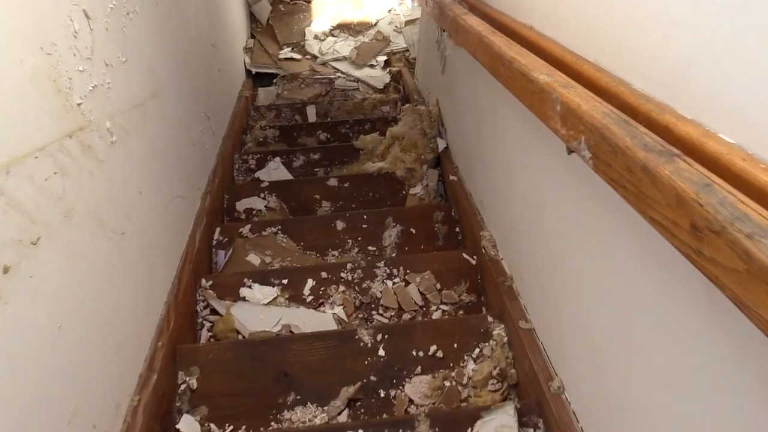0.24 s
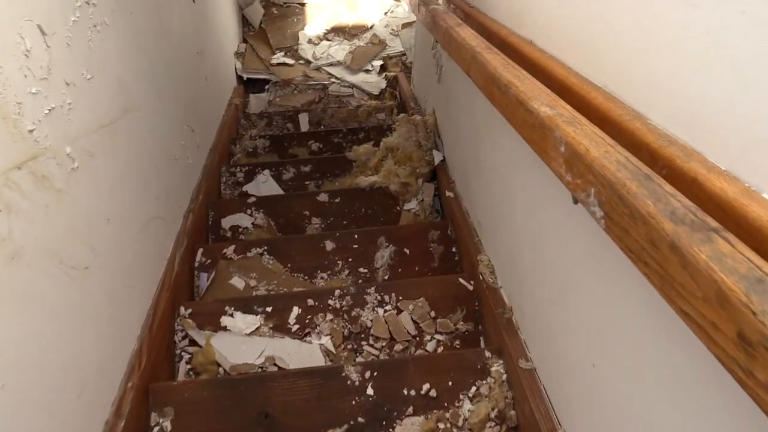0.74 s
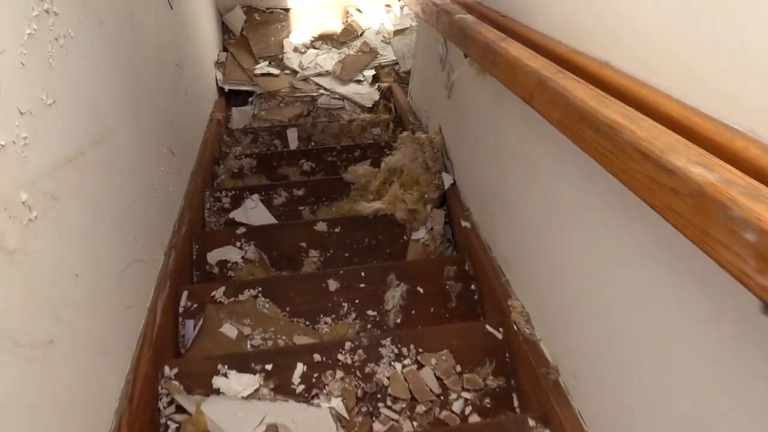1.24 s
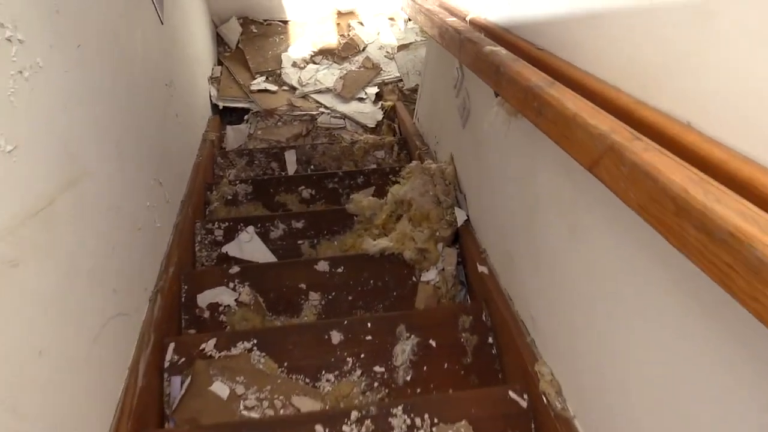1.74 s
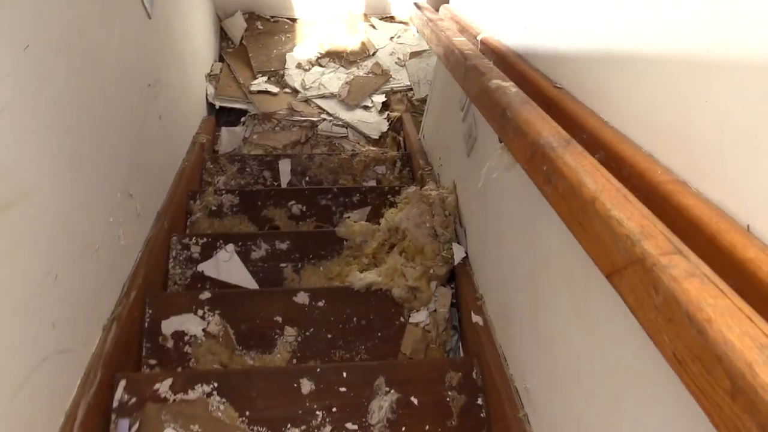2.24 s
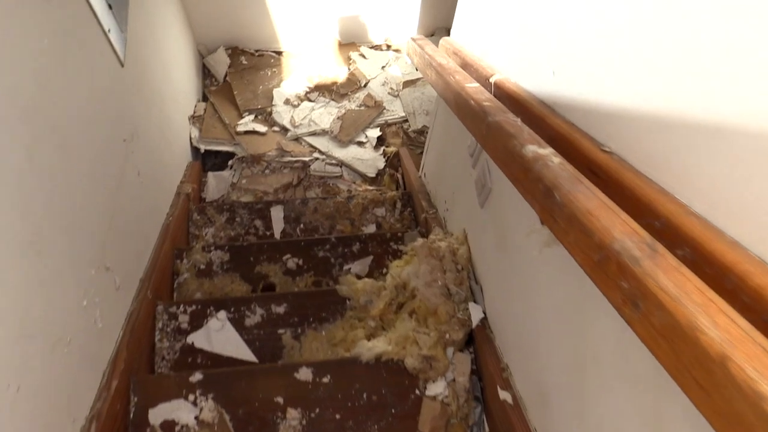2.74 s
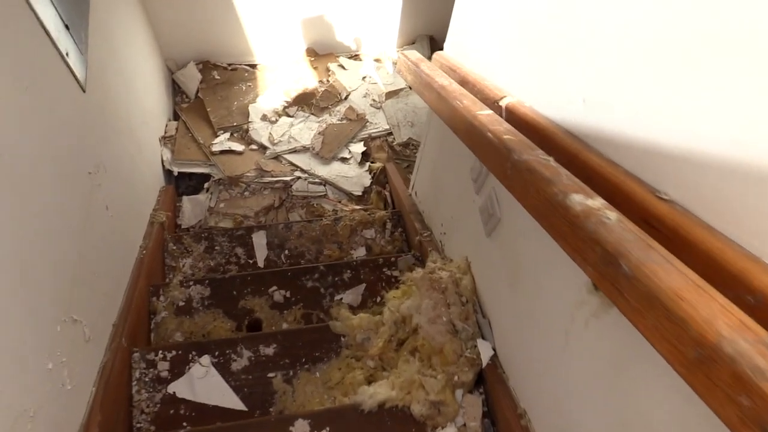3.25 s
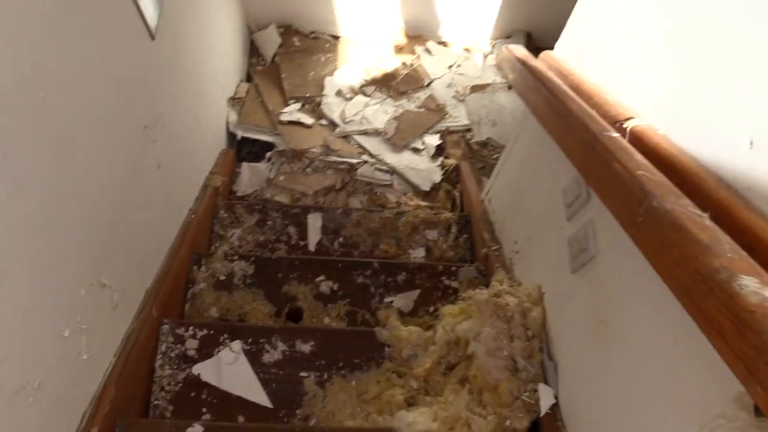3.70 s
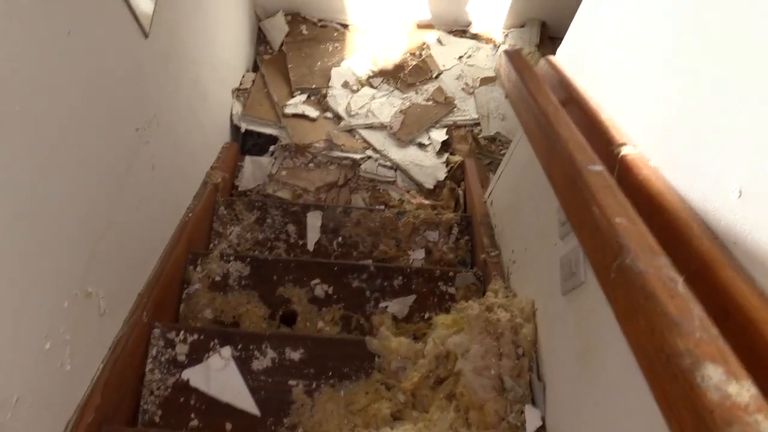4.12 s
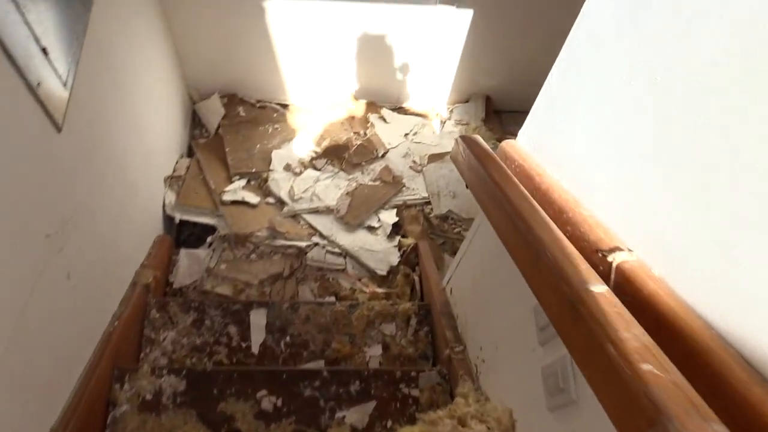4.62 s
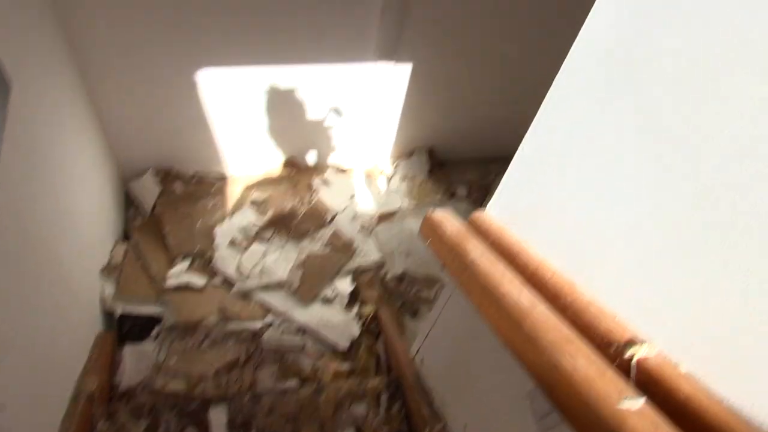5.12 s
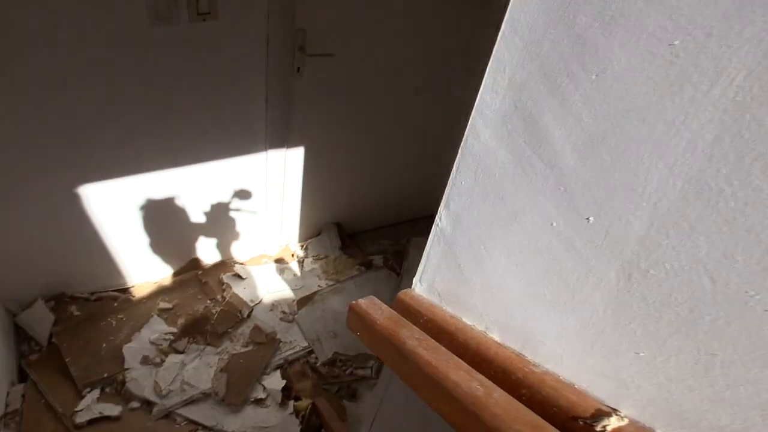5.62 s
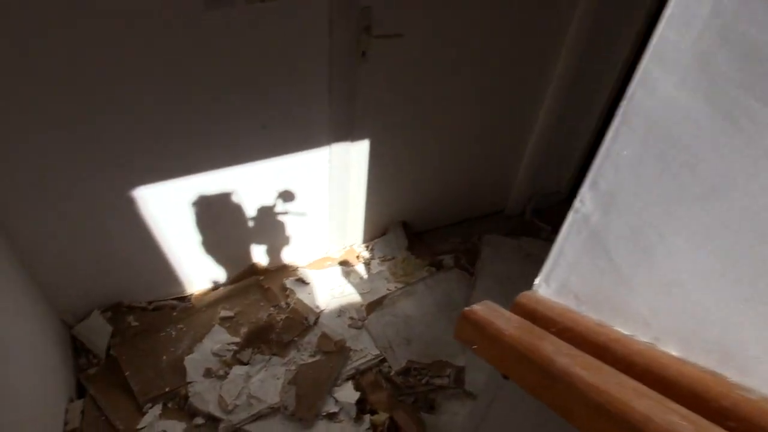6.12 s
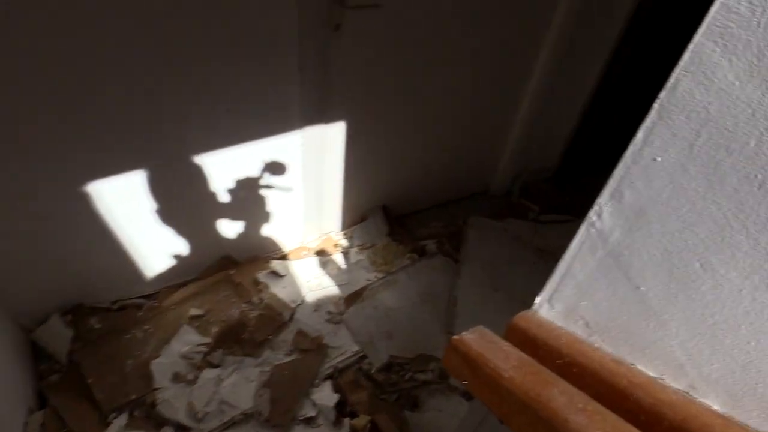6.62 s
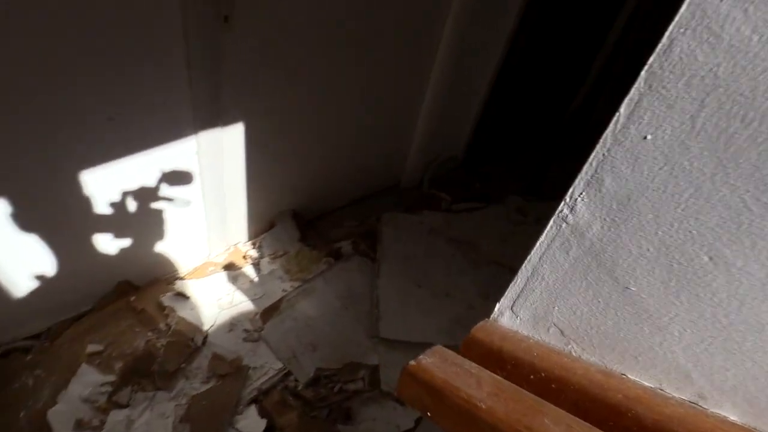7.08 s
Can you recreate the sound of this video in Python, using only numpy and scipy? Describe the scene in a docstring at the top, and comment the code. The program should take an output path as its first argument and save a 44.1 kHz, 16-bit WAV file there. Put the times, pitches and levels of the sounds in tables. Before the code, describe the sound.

Slow footsteps down a wooden stair littered with broken plasterboard, shards snapping sharply and grit crunching underfoot in a narrow, closely echoing stairwell.

```python
"""Footsteps down a littered wooden stair

Place: a bare, narrow stairwell whose wooden treads are strewn with broken plasterboard. Distance: close. Heels
ring the treads as dying modes, shards snap as shaped noise bursts, grit crunches as tiny ringing clicks; close
walls and a dense tail answer. The hand-held microphone adds lumpy noise for rumble and steady hiss, over
filtered noise for the building's hush and wavering sines for a faint whine; a thin tone flickers near 13 kHz."""
import sys
import numpy as np
from scipy import signal
from scipy.fft import rfft, irfft, next_fast_len
from scipy.io import wavfile
from scipy.ndimage import uniform_filter1d

SR = 44100
rng = np.random.default_rng(int(sys.argv[2]) if len(sys.argv) > 2 else 0)


def unload_audio(sound):
    """Save the sound as a 16-bit wav file, at the path given as the first command line argument."""
    columns = np.transpose(np.atleast_2d(sound))
    # keep every value between -1 and 1, then stretch to whole-number steps
    steps = np.round(np.clip(columns, -1, 1) * 32767)
    wavfile.write(sys.argv[1], SR, steps.astype(np.int16))


N = 324135

# Noise of the building. Each row: frequency in Hz, relative density in dB per Hz.
BUILDING_COLOUR = [(24, -28), (40, -12.5), (75, 2), (130, -11.5), (180, -4), (230, -6.5), (348, -8),
                   (399, -11), (536, -13), (870, -17.5), (2500, -31), (3250, -65.5), (5500, -120)]
# Noise of the microphone itself. Each row: frequency in Hz, relative density in dB per Hz.
HISS_COLOUR = [(1470, -27), (2500, 0), (4800, -5), (5270, -4.5), (7770, -8.5), (13200, -9), (16000, -18)]
BUILDING_DB, HISS_DB = -53.5, -68.5  # rms levels; the building swells a little around its own
# Thin high tones: a faint whine, and a lone thin tone near 13 kHz. Each row: frequency in Hz, level in dB rms.
HIGH_TONES = [(5992, -85.5), (7434, -97.5), (8931, -97), (11149, -104.5), (12990, -83.5)]
# Rumble at the microphone. Each row: frequency in Hz, relative density in dB per Hz.
RUMBLE_COLOUR = [(5.9, -66), (10, 8.5), (38, 0), (76, -0.5), (123, -17), (179, -13.5), (200, -16.5),
                 (260, -25.5), (440, -120)]
# Low lumps at the microphone. Each row: centre in seconds, top level in dB, half length in seconds.
LUMPS = [(0.033, -32.5, 0.078), (0.153, -34, 0.044), (0.228, -31.5, 0.057), (0.386, -35, 0.11),
         (0.52, -40.5, 0.17), (0.68, -36, 0.17), (1.081, -30.5, 0.095), (1.17, -36, 0.13),
         (1.837, -47, 0.058), (1.966, -39, 0.11), (2.15, -40.5, 0.25), (2.47, -45, .06), (2.604, -39, 0.11),
         (2.698, -40.5, .1), (3.172, -40, 0.093), (3.25, -46, 0.14), (3.464, -39.5, 0.087),
         (5.627, -48, 0.042), (5.753, -46, 0.06), (6.63, -52, .06), (7.23, -58, .12)]
# Faint stir beneath the lumps. Each row: time in seconds, middle level in dB.
STIR = [(0, -51), (1.5, -55), (3.498, -57), (4.5, -60), (7.35, -63.5)]
LUMP_EDGE_DB, STIR_SWING_DB = -17.5, 4  # level at a half length from the centre; rms swing of the stir

# Tail of the stairwell. Each row: frequency in Hz, time to die by 60 dB in seconds.
TAIL_T60 = [(100, 0.59), (260, 0.4), (700, 0.31), (1840, 0.24), (4850, 0.25), (8000, 0.27), (14000, 0.021)]
# First echoes from the close walls. Each row: delay in seconds, level against the direct sound in dB.
WALL_ECHOES = [(.0022, -31), (.0045, -16), (.0071, -18.5), (.0105, -15.5)]

# Grit under the sole. Each row: frequency in Hz, relative weight in dB per Hz.
GRIT_COLOUR = [(240, -56.5), (400, 0.5), (745, -6), (1040, -7), (1910, -8), (2290, -9), (7240, -29),
               (15000, -39)]
# A sole rolls over grit. Each row: heaviest moment in seconds, rise in seconds, release in seconds,
# relative level of coarse grit in dB, relative level of fine grit in dB.
SOLE_ROLLS = [(0.025, 0.029, 0.028, -47.5, -78), (.313, 0.089, 0.04, -54.5, -72),
              (0.429, 0.065, 0.11, -50, -59), (.55, 0.084, 0.22, -52.5, -73),
              (1.16, 0.18, 0.1, -54.5, -59.5), (1.3, 0.12, 0.057, -52.5, -63), (1.84, .03, .05, -61, -57),
              (1.89, 0.072, 0.33, -38, -52), (2.71, 0.15, .15, -44.5, -50.5),
              (2.84, 0.12, 0.28, -37, -52.5), (3.19, 0.086, 0.11, -62.5, -67), (3.45, 0.02, 0.13, -54, -64),
              (3.54, .04, 0.39, -45.5, -60.5), (3.74, 0.078, .05, -48.5, -63),
              (3.87, .06, 0.085, -47.5, -75), (4.0, 0.27, 0.3, -53.5, -65), (4.19, .14, 0.12, -60, -61),
              (4.409, 0.082, 0.25, -49.5, -60), (4.697, 0.13, 0.24, -49.5, -52.5),
              (4.765, 0.04, 0.27, -44, -60), (5.15, 0.048, 0.047, -60.5, -55),
              (5.4, 0.019, .06, -62.5, -80), (5.54, 0.052, 0.05, -53, -71), (6.14, .15, 0.25, -60, -68),
              (6.246, 0.036, .1, -51.5, -61.5), (6.359, 0.081, 0.28, -46, -63.5),
              (6.97, .15, .15, -75, -66.5), (7.17, .1, .1, -63, -57), (7.29, 0.22, 0.18, -40, -51)]
ROLL_EDGE_DB = -30  # a roll starts and ends this far below its top
COARSE_SETTLING_DB, FINE_SETTLING_DB = -75, -83  # relative levels of grit between steps
GRAIN_KINDS = 16

# Heels on treads. Each row: start in seconds, tread pitch in Hz, relative levels of board ring, riser ring,
# boom and slap in dB, push time in seconds.
HEEL_THUDS = [(0.213, 338, -26, -31, -40, -44, 0.0043), (1.053, 302, -26.5, -32.5, -45.5, -32, 0.0025),
              (1.824, 305, -32, -29, -38, -42.5, 0.0035), (2.595, 320, -22, -35, -36, -39.5, 0.002),
              (2.802, 360, -22.5, -32, -31.5, -20.5, 0.0014),
              (3.438, 420, -22.5, -44, -30.5, -43.5, 0.0042), (4.076, 366, -47, -45, -50, -54.5, 0.0048),
              (4.376, 350, -45, -39.5, -44, -42.5, 0.0057), (4.622, 333, -26.5, -27, -31.5, -35, 0.0034),
              (4.754, 330, -55, -36, -48, -40, 0.007), (5.535, 355, -56, -51, -44, -51.5, 0.0093),
              (6.023, 293, -42, -41.5, -41, -45.5, 0.0035), (6.333, 336, -47, -42, -44.5, -40, 0.0055),
              (7.084, 344, -34.5, -46, -39.5, -47, 0.0041), (7.183, 354, -12, -37, -43.5, -18.5, 0.0012)]
RISER_HZ, BOOM_SHARE = 177.4, .285  # on the stairs the boom lies at a share of the tread pitch
LANDING_S, LANDING_BOOM_HZ = 5.9, 75  # from here on the feet are on the landing, which booms lower

# Shards breaking. Each row: start in seconds, relative crack level in dB, crack pitch in Hz,
# relative clack level in dB, relative body level in dB, body pitch in Hz, relative fizz level in dB,
# crumbling time in seconds.
SHARD_SNAPS = [(0.014, -25.5, 3130, -32.5, -43, 690, -43, 0.024),
               (0.313, -36.5, 2730, -51, -36, 715, -53, 0.014),
               (0.3875, -44, 3310, -59, -52, 581, -63, 0.022),
               (0.406, -35, 3020, -32, -35, 1260, -47, 0.033),
               (0.4537, -11, 2140, -9.5, -5, 1010, -37, 0.014),
               (0.5131, -27, 3060, -24, -64, 1200, -37.5, 0.024),
               (0.5465, -33, 2560, -59, -58, 953, -45.5, .02),
               (0.665, -20.5, 2440, -27, -29.5, 1220, -43.5, 0.018),
               (0.9674, -42.5, 3080, -65, -44, 697, -69, .021),
               (1.0596, -33, 2900, -36, -31, 754, -57, 0.035),
               (1.1047, -38, 2400, -45, -40, 584, -68, 0.027),
               (1.141, -50, 3400, -62, -60, 700, -51, 0.018),
               (1.1575, -24.5, 2200, -25, -26, 1090, -41, 0.031),
               (1.1731, -27, 2450, -46, -22, 756, -59, 0.017),
               (1.1994, -36, 3400, -29, -49, 573, -46.5, 0.023),
               (1.2892, -49, 2370, -44, -53, 570, -54, 0.056),
               (1.8289, -38, 2340, -28, -44, 668, -56, 0.018),
               (1.868, -18.5, 4230, -27, -41, 700, -30.5, 0.056),
               (1.8963, -22.5, 2780, -21, -47, 625, -26.5, 0.039),
               (1.9442, -13, 3600, -1.5, -13.5, 1140, -26, 0.028),
               (2.028, -21.5, 3430, -20, -23, 1000, -39.5, 0.03),
               (2.0718, -61, 3560, -29, -46, 1100, -43, 0.016),
               (2.0912, -42, 3230, -35, -42, 700, -49, .024),
               (2.2706, -44, 2250, -40, -38, 800, -78, 0.019),
               (2.2859, -48, 2310, -46, -62, 589, -74, .022), (2.3283, -43, 2580, -35, -67, 751, -63, .024),
               (2.6675, -39, 2690, -35, -36, 900, -53, 0.03),
               (2.6927, -26, 3030, -39, -46, 533, -57, 0.024),
               (2.7133, -25, 2270, -23, -25, 1040, -32.5, 0.039),
               (2.762, -15, 2850, -17, -15, 820, -32, 0.013),
               (2.7737, -18, 2377, -26, -16, 597, -43, 0.021),
               (2.789, -25.5, 2884, -31, -33, 700, -41.5, .015),
               (2.8006, 1, 2630, 0, -7, 517, -18.5, 0.021), (3.1203, -43, 2300, -49, -61.5, 522, -58, 0.04),
               (3.157, -36, 2360, -44.5, -61, 563, -45.5, 0.029),
               (3.2027, -32.5, 3170, -41, -66, 566, -42, 0.026),
               (3.4365, -38, 2880, -31, -27.5, 1250, -58, 0.037),
               (3.5295, -13.5, 3770, -8.5, -10, 640, -27, 0.032),
               (3.7311, -24.5, 2300, -37, -44, 770, -80, 0.016),
               (3.7943, -27, 2270, -20.5, -14.5, 950, -45.5, 0.026),
               (3.84, -23, 2480, -30, -27.5, 750, -47, 0.017),
               (3.8649, -36, 2330, -22, -26, 791, -54, 0.034),
               (3.8753, -28, 3300, -55, -42, 810, -58, 0.026),
               (3.922, -31.5, 3480, -31.5, -34, 840, -51, 0.022),
               (3.99, -38, 2650, -59, -39, 1240, -58, 0.031),
               (4.0065, -30.5, 2300, -35, -27.5, 1320, -58, 0.018),
               (4.0706, -39.5, 3630, -44, -42, 770, -58, 0.023),
               (4.3726, -24, 3800, -20.5, -21, 820, -37.5, 0.041),
               (4.4406, -37, 3590, -66, -39, 896, -50, .022),
               (4.4716, -39.5, 3010, -56, -32.5, 657, -45.5, 0.03),
               (4.6616, -37, 3420, -69, -26, 644, -64, 0.072),
               (4.6933, -31, 3400, -38, -34, 580, -44, 0.032),
               (4.7506, -12.5, 2270, -11.5, -9.5, 598, -29.5, 0.035),
               (4.784, -30, 2330, -17.5, -25, 590, -39, 0.04),
               (6.0795, -39, 3530, -37, -63, 980, -49.5, 0.04),
               (6.13, -35, 2460, -30.5, -29, 597, -47, 0.037),
               (6.198, -45, 2600, -48, -53, 700, -66, 0.034),
               (6.2335, -27, 2400, -29.5, -37, 670, -49, 0.035),
               (6.33, -19, 2280, -18, -20.5, 686, -47, 0.024),
               (6.3923, -22.5, 2450, -26, -19, 665, -50.5, 0.033),
               (6.4205, -36.5, 2280, -27.5, -39, 560, -58, 0.05),
               (7.15, -38.5, 2780, -53, -56, 855, -65, 0.023),
               (7.1791, 0, 2590, -11.5, -6, 880, -17.5, 0.024),
               (7.181, 0, 3300, -21, -13, 1150, -24.5, 0.034),
               (7.1963, -49, 3010, -17, -7.5, 515, -47, 0.073),
               (7.3105, -14, 3000, -24.5, -28, 523, -35.5, 0.018)]
# Fizz of plasterboard dust. Each row: frequency in Hz, relative level in dB per octave.
FIZZ_COLOUR = [(5200, 9), (7500, 5), (10000, 2), (16000, -10.5), (22050, -30)]
CLACK_HZ, KNOCK_DB = 1600, -3  # middle mode of the plasterboard; knock on the tread against the shard's body
PIECE_MODES, PIECE_RING_DB, PIECE_SHARPNESS = 9, 6, 9  # a piece's own modes: count, height, pitch over width

EDGE_HZ = 16000  # upper band limit at the microphone


def gain_of(db):
    """Decibels to amplitude."""
    return 10 ** (np.asarray(db) / 20)


def evened(x):
    """Scales to rms 1."""
    return x / np.sqrt(np.mean(x ** 2) + 1e-20)


def peaked(x):
    """Scales to peak 1."""
    return x / (abs(x).max() + 1e-20)


def smoothed_twice(x, width):
    """Slows noise to a gentle drift by two running means."""
    return uniform_filter1d(uniform_filter1d(x, width), width)


def read(points, hz):
    """Reads a spectrum on a log-frequency axis."""
    f, value = np.transpose(points)
    return np.interp(np.log(hz + 1), np.log(f + 1), value)


def along(rows):
    """Reads every column of a curve at each sample."""
    s, *columns = np.transpose(rows)
    return [np.interp(np.arange(N) / SR, s, c) for c in columns]


def coloured(x, points):
    """Gives x a spectrum."""
    size = next_fast_len(len(x))
    gain = gain_of(read(points, np.fft.rfftfreq(size, 1 / SR)))
    return irfft(rfft(x, size) * gain, size)[:len(x)]


def add(mix, s, sound):
    """Mixes a sound in at time s."""
    part = mix[round(s * SR):][:len(sound)]
    part += sound[:len(part)]


def humps(centre, rise, release, top_db, edge_db):
    """Level made of events that swell to their top and sink away, added as powers."""
    step = 64  # samples between computed levels
    late = np.arange(0, N + step, step) / SR - np.array(centre)[:, None]
    part = np.where(late < 0, -late / np.array(rise)[:, None], late / np.array(release)[:, None])
    power = gain_of(np.array(top_db)[:, None] + edge_db * part ** 1.26) ** 2
    return np.sqrt(np.interp(np.arange(N), np.arange(power.shape[1]) * step, power.sum(0)))


def cluster(t, hz, spread, cycles, chance):
    """A main mode and its weaker neighbours, all set off together and dying after a number of cycles."""
    others = hz * np.exp(spread * (2 * chance - 1))[:, None]
    near = np.sin(2 * np.pi * others * t) * gain_of(-60 * t * others / cycles)
    main = np.sin(2 * np.pi * hz * t) * gain_of(-60 * t * hz / cycles)
    return peaked(main + 0.52 * near.sum(0))


def ring(drive, hz, sharpness):
    """A broad resonance, applied twice, scaled to peak 1."""
    b, a = signal.iirpeak(hz, sharpness, fs=SR)
    return peaked(signal.lfilter(b, a, signal.lfilter(b, a, drive)))


def causal(gain_db, size):
    """Adds to a gain the phase of a filter that starts at once and rings only afterwards."""
    cepstrum = irfft(np.log(gain_of(gain_db)), size)
    cepstrum[1:size // 2] *= 2
    cepstrum[size // 2 + 1:] = 0
    return np.exp(rfft(cepstrum))


def hush():
    """Noise of the building, swelling slightly, and steady microphone hiss, with thin wavering high tones."""
    t = np.arange(N) / SR
    swell = evened(smoothed_twice(rng.standard_normal(N), 9000))
    waver = evened(uniform_filter1d(rng.standard_normal(N), 900))
    pace = t + np.cumsum(waver) * .0015 / SR  # one shared clock bends all the tones
    tones = sum(gain_of(db) * np.sqrt(2) * np.sin(2 * np.pi * hz * pace) for hz, db in HIGH_TONES)
    building_level = gain_of(BUILDING_DB + 0.43 * swell)
    building = building_level * evened(coloured(rng.standard_normal(N), BUILDING_COLOUR))
    hiss = gain_of(HISS_DB) * evened(coloured(rng.standard_normal(N), HISS_COLOUR))
    return building + hiss + tones


def rumble():
    """Low lumps of air and hand movement at the microphone, over a faint uneven stir."""
    s, lump_db, half = np.transpose(LUMPS)
    swing = evened(smoothed_twice(rng.standard_normal(N), 2500))
    lumps = humps(s, half, half, lump_db, LUMP_EDGE_DB)
    stir = gain_of(along(STIR)[0] + STIR_SWING_DB * swing)
    return np.hypot(lumps, stir) * evened(coloured(rng.standard_normal(N), RUMBLE_COLOUR))


def stairwell(x):
    """Close walls, then a dense tail whose bands die at their own speeds, its echo pattern shifting steadily."""
    early, taps = np.zeros(SR // 20), np.zeros((3, SR // 2 + SR // 4))
    for k, (s, db) in enumerate(WALL_ECHOES):
        early[round(s * SR)] = (-1) ** k * gain_of(db)
    # one echo of random sign and place in every 10 samples
    at = np.arange(160, taps.shape[1] - 10, 10)
    echo_at = at + rng.integers(0, 10, (3, len(at)))
    np.put_along_axis(taps, echo_at, rng.choice([-1., 1.], (3, len(at))), 1)
    hz, t, z = signal.stft(taps, SR, nperseg=256)
    dying = gain_of(-60 * t / read(TAIL_T60, hz)[:, None])
    tails = signal.istft(z * dying, SR, nperseg=256)[1]
    tails *= gain_of(-8.5) / np.linalg.norm(tails, axis=1, keepdims=True)
    # the shares of three tails turn steadily, their summed power staying even
    turn = np.arange(N) / SR * 3 + np.arange(3)[:, None] / 3
    shares = np.sqrt(2 / 3) * np.cos(np.pi * turn)
    tail = signal.fftconvolve(x * shares, tails, axes=1).sum(0)[:N]
    return x + signal.oaconvolve(x, early)[:N] + tail


def grit():
    """Dense, randomly clumped tiny cracks of very uneven size and pitch, swelling as the sole rolls."""
    s, rise, release, coarse_db, fine_db = np.transpose(SOLE_ROLLS)
    coarse_level = np.hypot(humps(s, rise, release, coarse_db, ROLL_EDGE_DB), gain_of(COARSE_SETTLING_DB))
    fine_level = np.hypot(humps(s, rise, release, fine_db, ROLL_EDGE_DB), gain_of(FINE_SETTLING_DB))
    clumps = evened(uniform_filter1d(rng.standard_normal(N), 500))
    size_db = 2.5 * np.minimum(rng.exponential(1, N), 5) + 2.5 * clumps
    size = gain_of(size_db) * rng.choice([-1, 1], N)
    clicks = size * (rng.random(N) < 2500 / SR)  # about 2500 a second
    kind, t = rng.integers(0, GRAIN_KINDS, N), np.arange(600) / SR
    grains = 0.77 * clicks
    for k, hz in enumerate(np.geomspace(600, 11000, GRAIN_KINDS)):
        chip = np.sin(2 * np.pi * hz * t) * gain_of(-60 * t * hz / 14)
        chip = chip / np.linalg.norm(chip) * np.sqrt(hz / 3000)
        grains = grains + signal.oaconvolve(clicks * (kind == k), chip)[:N]
    grains = evened(coloured(grains, GRIT_COLOUR))
    coarse = signal.sosfilt(signal.butter(N=3, Wn=4500, fs=SR, output="sos"), grains)
    fine = signal.sosfilt(signal.butter(N=3, Wn=4500, btype="high", fs=SR, output="sos"), grains)
    return coarse_level * evened(coarse) + fine_level * evened(fine)


def heels():
    """The soft heel pushes the tread for a few ms: board, riser and stair ring low, with a dull slap on top."""
    out, t = np.zeros(N), np.arange(SR // 4) / SR
    chances = rng.random((len(HEEL_THUDS), 6))
    scuffs = rng.standard_normal((len(HEEL_THUDS), len(t)))
    for row, chance, noise in zip(HEEL_THUDS, chances, scuffs):
        s, tread_hz, board_db, riser_db, boom_db, slap_db, push = row
        boom_hz = BOOM_SHARE * tread_hz if s < LANDING_S else LANDING_BOOM_HZ
        board = gain_of(board_db) * cluster(t, tread_hz, 0.38, 22.8, chance[:3])
        riser = gain_of(riser_db) * cluster(t, RISER_HZ, 0.23, 15, chance[3:5])
        boom = gain_of(boom_db) * cluster(t, boom_hz, 0.24, 15.0, chance[5:])
        slap = gain_of(slap_db) * ring(noise * gain_of(-60 * t / 0.039), 560, 1.2)
        soft_onset = 1 - np.exp(-(t / max(push, .001)) ** 2)
        add(out, s, (board + riser + boom + slap) * soft_onset)
    return out


def shards():
    """A break is a short run of cracks with all pitches in it; shard, dust and tread give it its colour."""
    out, size = np.zeros(N), 4096
    t, hz = np.arange(size) / SR, np.fft.rfftfreq(size, 1 / SR)
    per_octave_db = -10 * np.log10(hz / 1000 + .01)  # turns levels per octave into levels per Hz
    draws = rng.standard_normal((len(SHARD_SNAPS), size + PIECE_MODES))
    for row, noise, chance in zip(SHARD_SNAPS, draws[:, :size], draws[:, size:]):
        s, crack_db, crack_hz, clack_db, body_db, body_hz, fizz_db, crumble = row
        knock_db = body_db + KNOCK_DB
        rise = 1 - np.exp(-t / (0.0001 + 35 * crumble ** 3))  # long crumbling also gives way slowly
        dying = gain_of(-60 * t / max(crumble, .002)) * rise
        cracks = rfft(noise * dying)
        power = abs(cracks) ** 2
        cracks /= causal(10 * np.log10(power + .4 * np.mean(power)), size=size)  # evens out the pitches
        tread = [(60, knock_db - 49.0), (190, knock_db - 4.5), (345, knock_db)]
        hollow = (np.sqrt(345 * body_hz), (knock_db + body_db) / 2 - 4.5)  # between tread and shard
        valley = (np.sqrt(CLACK_HZ * crack_hz), min(clack_db, crack_db) - 1.0)  # between the two upper modes
        shoulder = (min(1.266 * crack_hz, 4700), crack_db - 3.5)
        shard = [hollow, (body_hz, body_db), (CLACK_HZ, clack_db), valley, (crack_hz, crack_db), shoulder]
        dust = [(f, fizz_db + db) for f, db in FIZZ_COLOUR]
        own_modes = np.geomspace(700, 7000, PIECE_MODES) * np.exp(.15 * chance)
        modes = np.r_[body_hz, crack_hz, own_modes][:, None]
        peaks = 1 / (1 + (2 * PIECE_SHARPNESS * (hz / modes - 1)) ** 2)
        ringing_db = PIECE_RING_DB * (peaks.max(0) - .4)
        colour = causal(read(tread + shard + dust, hz) + ringing_db + per_octave_db, size=size)
        add(out, s, irfft(cracks * colour, size) * np.sqrt(rise))
    return out


def scene():
    """Feet close by in the stairwell, over rumble and hush."""
    feet = gain_of(10.0) * heels() + gain_of(28.5) * shards() + gain_of(-1.5) * grit()
    # the feet carry nothing below about 50 Hz
    airborne = signal.sosfilt(signal.butter(N=2, Wn=50, btype="high", fs=SR, output="sos"), feet)
    return (stairwell(airborne) + rumble() + hush())[None]


def record(dry):
    """Peaks beyond full scale are clipped flat; then the band limit."""
    band_limit = signal.firwin(511, EDGE_HZ, window=("kaiser", 9), fs=SR)[None]
    return signal.oaconvolve(np.clip(dry, -1, 1), band_limit, "same")


dry = scene()
out = record(dry)
unload_audio(out)
```